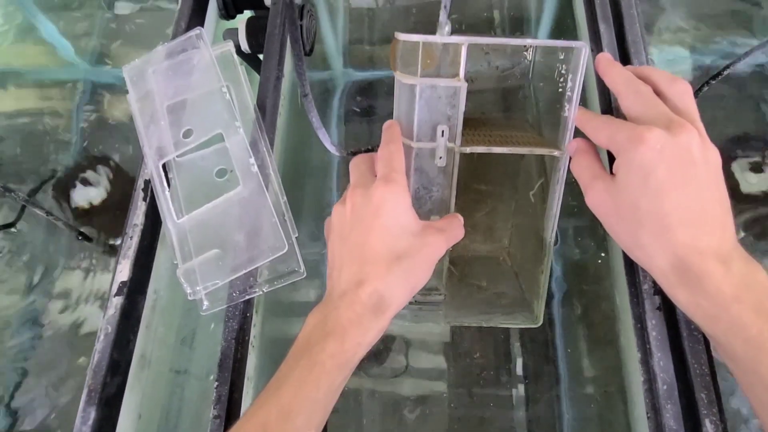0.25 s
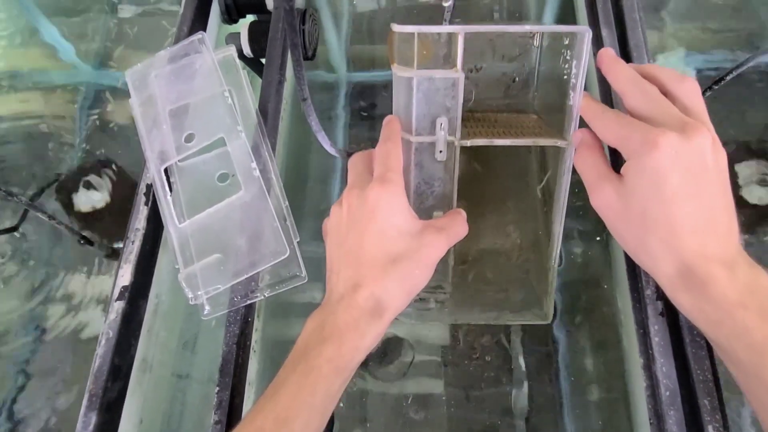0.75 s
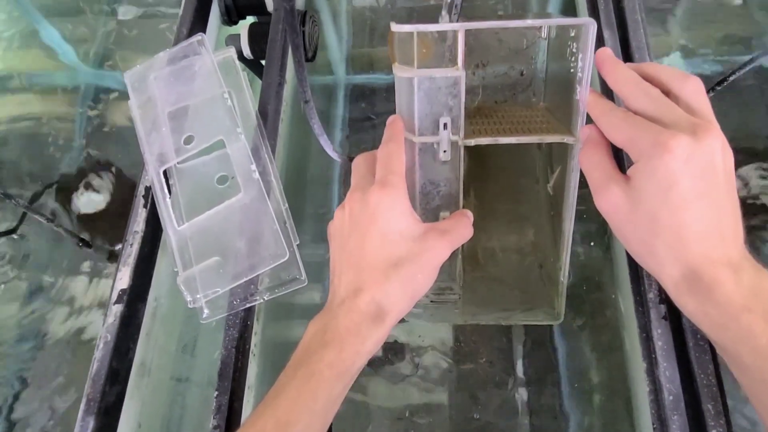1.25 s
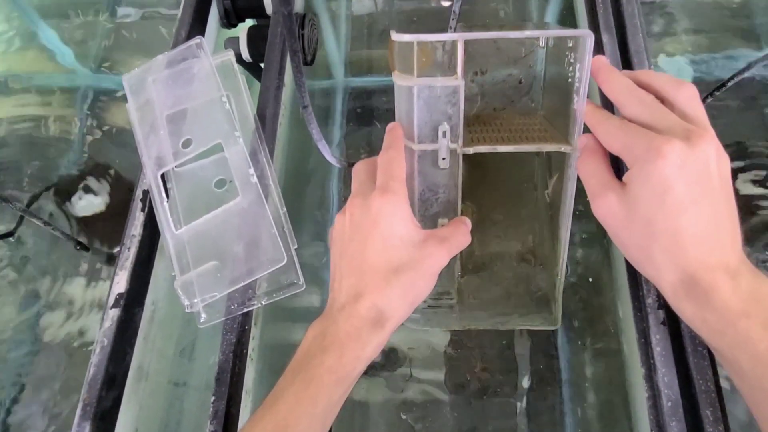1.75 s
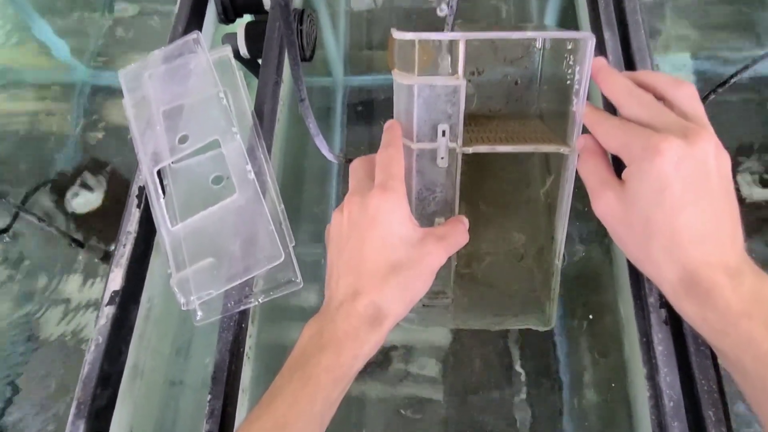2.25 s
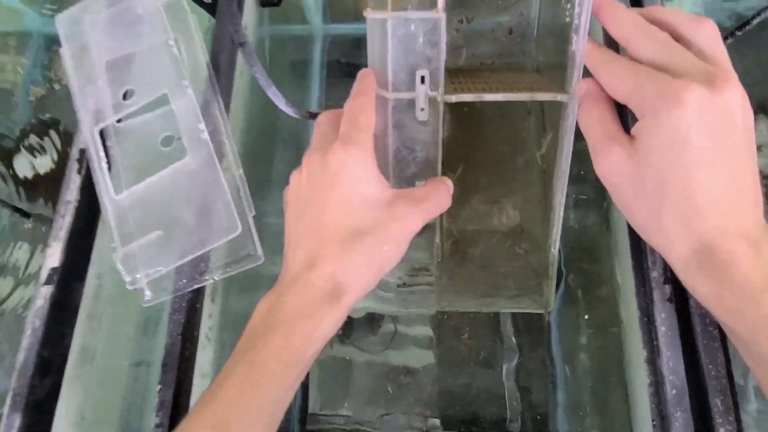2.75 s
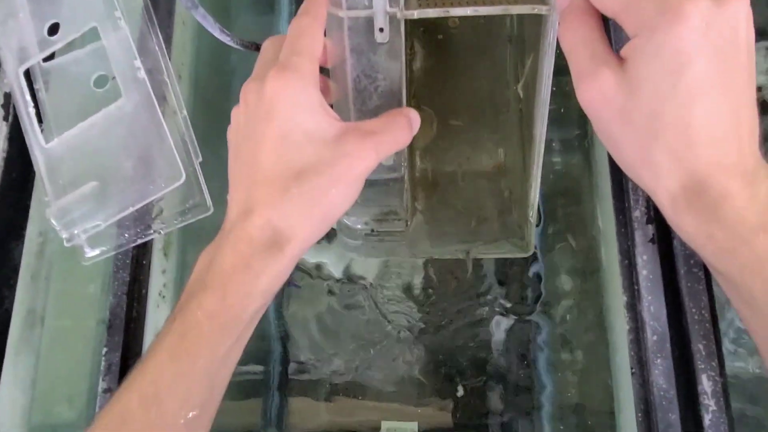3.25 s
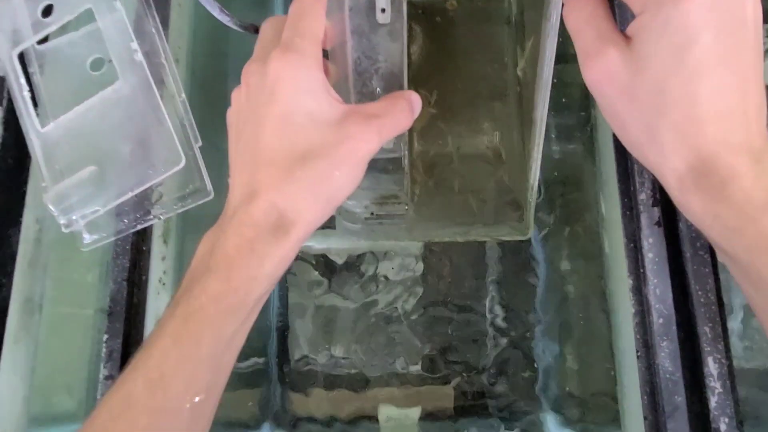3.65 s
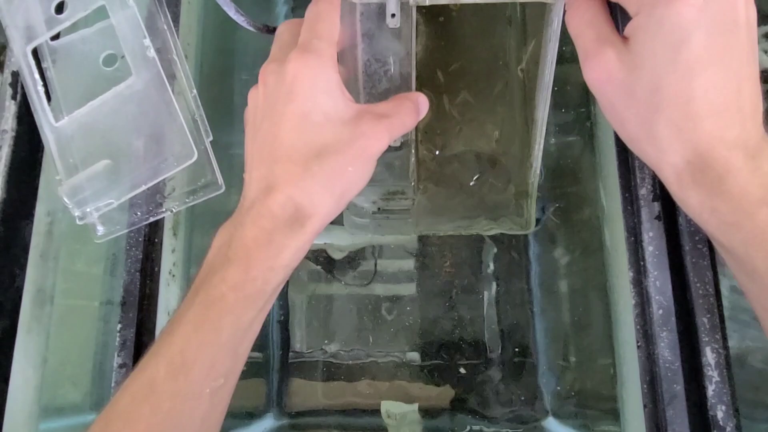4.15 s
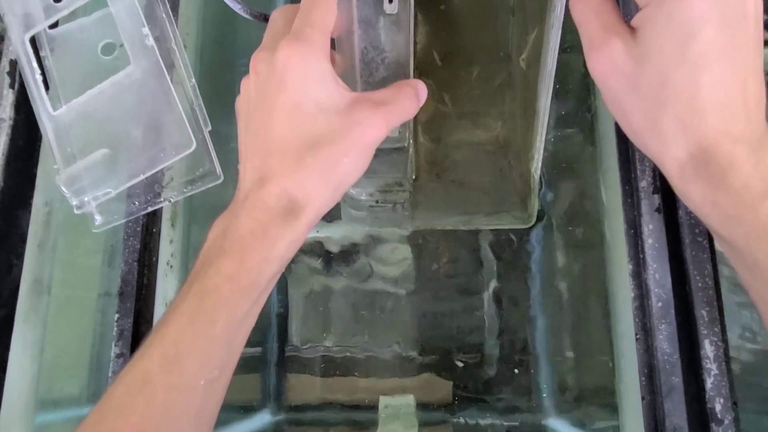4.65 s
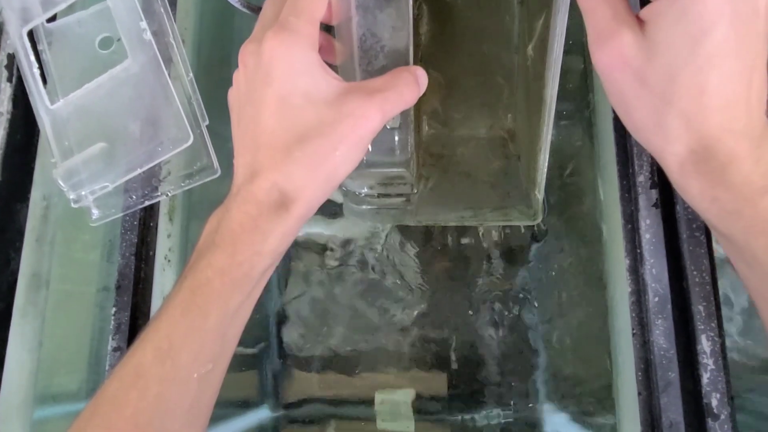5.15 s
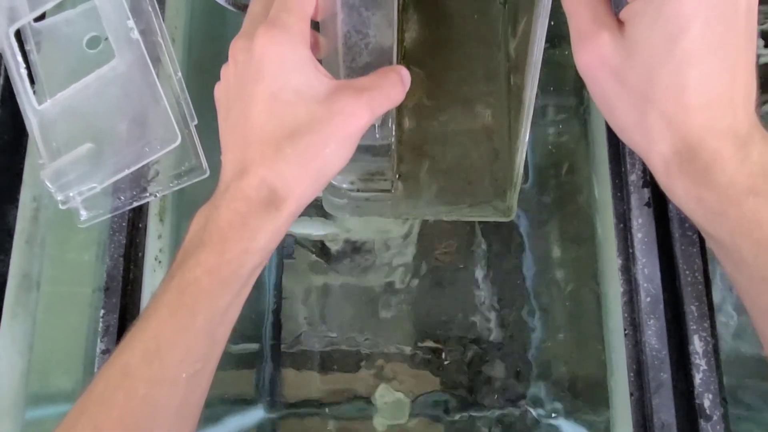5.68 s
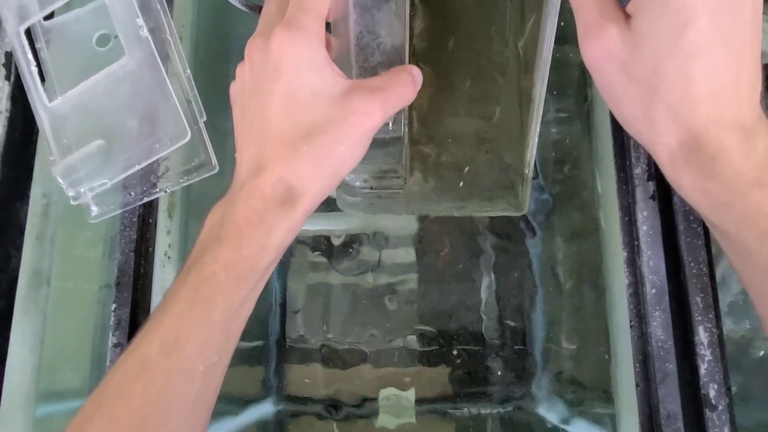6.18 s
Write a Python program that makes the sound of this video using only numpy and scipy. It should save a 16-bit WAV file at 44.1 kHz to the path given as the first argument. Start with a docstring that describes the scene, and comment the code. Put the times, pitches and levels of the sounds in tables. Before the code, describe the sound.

In a fish room, water dribbles unevenly into a plastic box: short pours, gulps, rising bubble plops, and small gaps in the first two and a half seconds, then longer gurgling pours with drops pattering on plastic. The boxy resonance sways in pitch. Quiet pumps rumble and air hisses softly. Close stereo microphones shift slightly along the box.

```python
"""In a fish room, water pours in a gurgling stream into a narrow plastic box held in a tank.
Uneven splashes excite the air pocket above the water, a resonator whose pitch sways as it sloshes.
The flow sputters into gulps, briefly stops and resumes; bubbles ring as decaying sines that climb in pitch.
Stray drops patter as noise bursts. Pumps hum as sines and rumble as noise; aeration hisses.
Box resonances, wall echoes and two microphones that shift along the box shape the stereo sound."""
import sys
import numpy as np
from scipy import signal
from scipy.fft import rfft, irfft, next_fast_len
from scipy.io import wavfile
from scipy.ndimage import uniform_filter1d, map_coordinates

SR = 44100
rng = np.random.default_rng(int(sys.argv[2]) if len(sys.argv) > 2 else 0)


def dump_mix(stems):
    """Bounce the given channels to the path in sys.argv[1] as a 16-bit WAV at rate SR."""
    frames = np.atleast_2d(stems).T  # one column per channel
    limited = np.clip(frames, -1, 1)  # hard clip at full scale
    pcm = np.round(limited * 32767).astype(np.int16)
    wavfile.write(sys.argv[1], SR, pcm)


N = 283122  # samples

# Levels of sources are relative: mixing gains, the box and the microphones act on them later.
# hum of the pumps: [f/Hz, level/dB]
PUMP_HUM = [(65, -46.5), (120, -52), (241, -53.5)]
# spectra of the pumps' rumble and of the aeration hiss: [f/Hz, level/dB]
RUMBLE_SPECTRUM = [(20, -24), (42, -11), (55, -9.5), (66, -2), (78, -7.5), (100, -4), (120, -10.5),
                   (140, -11), (195, -15), (240, -10.5), (330, -15), (480, -21.5), (800, -37.5)]
HISS_SPECTRUM = [(180, -17), (300, -2), (500, -4), (700, 2.5), (1250, -7), (1600, -5), (3000, -8.5),
                 (4100, -13), (4800, -16.5), (7200, -13.5), (9000, -18.5), (10700, -24), (12300, -17.5),
                 (15500, -29)]
# likeness of the diffuse noise in two channels: [f/Hz, correlation]
DIFFUSE_LIKENESS = [(60, 0.96), (180, 0.91), (550, 0.69), (1650, 0), (15000, 0)]
# reverberation of glass tanks and walls: [f/Hz, 60 dB decay time/s]
WALL_DECAY = [(200, 0.14), (1500, 0.12), (10000, 0.013)]
# lowest resonance of the swaying air pocket: [t/s, f/Hz]
POCKET_PITCH = [(0.0, 1038), (0.14, 1200), (0.29, 916), (0.48, 1110), (0.89, 997), (1.39, 1100),
                (1.59, 1000), (1.88, 1150), (1.97, 1025), (2.14, 976), (2.32, 1170), (2.68, 974),
                (2.93, 1130), (3.11, 1128), (3.27, 936), (3.61, 1150), (3.81, 922), (4.02, 1140),
                (4.27, 1002), (4.42, 1090), (5.08, 956), (5.26, 1160), (5.52, 980), (5.99, 1117),
                (6.24, 978), (6.42, 1103)]
# modes of the air pocket: [f at rest/Hz, width of first pass/Hz, level/dB, power of the sway followed]
POCKET_MODES = [(1062, 107, -1, 1), (2229, 270, 3.5, -0.066), (3393, 236, -1, -0.23),
                (4586, 310, -13, -0.3)]
# unbroken pours of the stream: [start t/s, end t/s, flow level/dB, spray level/dB]
POUR_SPELLS = [(-0.03, 0.07, -26, -32), (0.125, 0.309, -27.5, -29), (0.353, 0.412, -24, -43),
               (0.696, 0.97, -22, -28), (0.96, 1.062, -24, -30), (1.35, 1.46, -27, -50),
               (1.484, 1.652, -22, -31.5), (1.926, 1.965, -31, -30.5), (1.989, 2.227, -23, -30),
               (2.448, 2.559, -30, -34), (2.526, 2.982, -25, -31), (3.025, 3.033, -29, -36),
               (3.085, 3.106, -24, -31), (3.143, 3.456, -23, -34), (3.659, 3.89, -23.5, -33.5),
               (3.878, 3.985, -20, -32), (4.075, 4.265, -22, -31.5), (4.31, 4.367, -24, -39),
               (4.415, 4.894, -23, -32), (4.936, 5.17, -26, -44.5), (5.158, 5.244, -20, -35),
               (5.328, 5.522, -24, -32), (5.574, 6.185, -24, -31), (6.219, 6.275, -24.5, -34.5),
               (6.308, 6.425, -21, -32.5)]
# heaviest drops on the plastic: [t/s, level/dB]
HEAVY_DROPS = [(0.092, -34.5), (0.275, -39), (0.746, -35), (0.875, -36.5), (0.934, -32.5), (1.534, -36),
               (1.649, -41), (2.583, -29.5), (2.776, -31), (3.217, -33), (3.784, -35.5), (4.143, -30),
               (4.319, -32.5), (5.688, -37)]
# loud single bubbles: [t/s, level/dB, nominal f/Hz]
LOUD_BUBBLES = [(0.396, -7.5, 2013), (0.419, -16, 1710), (0.464, -28, 1340), (0.706, -18, 2000),
                (0.941, -3, 3360), (1.099, -17, 1320), (1.125, -13.5, 2880), (1.144, -17, 2230),
                (1.259, -14.5, 4620), (1.285, -5.5, 1203), (1.386, -7, 2560), (1.689, -3, 1860),
                (1.719, -10, 1366), (1.772, -6.5, 1850), (1.863, -6, 1240), (1.913, -7.5, 1256),
                (1.946, -9, 1886), (2.288, -22, 1310), (3.042, -7.5, 1045), (3.118, -11, 1250),
                (3.434, -8.5, 2080), (3.454, -9, 1123), (3.478, -10, 2840), (3.600, -9.5, 4300),
                (3.986, -6, 1810), (4.091, -6, 3376), (5.292, -7.5, 2124), (5.301, -7, 2970),
                (5.313, -2, 1144), (5.348, -5, 3450), (5.693, -3.5, 3550)]
# spells in which the choked stream gurgles: [start t/s, end t/s, level of the loudest bubbles/dB]
GURGLE_SPELLS = [(0.399, 0.499, -24), (1.081, 1.20, -16.5), (1.376, 1.507, -11), (1.665, 1.757, -16),
                 (1.88, 1.979, -18), (2.244, 2.295, -24), (3.418, 3.501, -13), (3.959, 4.086, -11),
                 (5.222, 5.329, -16)]
# slugs of water where the stream breaks up: [t/s, level/dB, spray level relative to the slug/dB]
WATER_SLUGS = [(0.125, -12, -8), (0.383, -11, -14), (0.674, -7.5, -30), (0.79, -7.5, -21),
               (1.120, -15, -20), (1.165, -11, -37), (1.219, -14.5, -16), (1.314, -16.5, -10),
               (1.367, -11, -24), (1.408, -13.5, -37), (1.465, -9.5, -26), (1.675, -10.5, -32),
               (1.743, -12.5, -38), (1.772, -8, -31), (1.889, -8.5, -14), (1.997, -16, 4),
               (2.274, -23, -30), (2.328, -26, -4), (2.421, -16, 2), (3.027, -10, -14), (3.477, -8.5, -33),
               (3.521, -10, -15), (3.573, -15, -23), (3.621, -13, -23), (3.671, -10.5, 0), (4.054, -6, -34),
               (4.418, -4, -6), (5.254, -22, -36), (5.587, -18.5, -35)]
# bubble sizes that a slug traps: [central f/Hz, level/dB]
TRAPPED_BUBBLES = [(1230, -15), (1930, -12.5), (2900, -13)]
# spectra of a slug's splash, of the stream's wash and of fine spray: [f/Hz, level/dB]
SLUG_SPECTRUM = [(200, -11.5), (500, -7.5), (750, -6.5), (1150, 8.5), (1450, -24), (1900, 5.5), (2500, 0.5),
                 (3100, 8), (3700, -14), (4800, -7.5), (5400, -19), (15000, -39)]
WASH_SPECTRUM = [(150, -19.5), (450, -10), (600, 2.5), (1200, 2), (1450, -13), (1800, -1), (2450, 2),
                 (2700, -1), (3150, 4.5), (3900, -23), (4800, -14), (5300, -56), (15000, -78)]
SPRAY_SPECTRUM = [(2500, -58), (4000, 17.5), (5300, 2.5), (8700, 11), (10500, -7), (12200, 5.5),
                  (15500, -9)]
# fixed resonances of the box: [f/Hz, width/Hz, level/dB, left minus right level/dB]
BOX_MODES = [(690, 170, -5, 2), (975, 65, 0, -3), (1125, 60, 0, 3), (1285, 90, 0, -8), (1960, 130, -1, -7),
             (2220, 210, -6, 1), (2460, 110, -7, 0), (3350, 120, -4, -4)]
# balance of the microphones, before each position's offset: [f/Hz, left minus right level/dB]
MIC_BALANCE = [(400, -2), (800, -5.5), (1100, 0.5), (2200, -2), (4200, -8), (6500, -0.5)]
# lead of the nearer, left microphone at the second position: [f/Hz, phase/rad]
MIC_LEAD = [(20, 0), (650, .5), (950, 0), (1180, 1.9), (1600, .9), (1950, 2.2), (2250, 1.9), (3300, 4.3),
            (4650, 6.6), (8900, 11.4), (15000, 18.5)]
# colour of the water at the first position: [f/Hz, level/dB]
FIRST_POSITION_COLOUR = [(700, 0.5), (1000, 1.5), (1130, -6.5), (1300, 1), (1600, 4), (1950, 0.5),
                         (2250, -1), (2800, 1.5), (3400, 0), (5000, 1.5)]

PUMP_DB, PUMP_RISE_DB = -43, 1  # relative rumble level; its gain once the microphones have moved
MOVE_S, MOVE_LENGTH_S = 2.25, 0.87  # start and length of the microphones' shift along the box
FIRST_LEAD_SHARE, FIRST_PAN_DB = 0.76, -2  # first position: shorter lead, and more on the right
ATTACK_S, RELEASE_S = 0.017, 0.06  # a pour swells linearly, then drains (e-fold time)
SPRAY_ATTACK_S, SPRAY_RELEASE_S = 0.0067, 0.019  # its spray stops sooner
SAG_DB_PER_S, SPRAY_SAG_DB_PER_S = 1.5, 2.5  # a pour weakens as it runs
CREST_DB_PER_OCTAVE = 6  # cresting water drives the air pocket harder
WAVER = 0.012  # share by which ripples detune each pocket mode, per unit of random curve
DROP_DB, DROP_RANGE_DB = -10, 18  # lighter drops: relative level of the largest; range of sizes
DROP_SPRAY_DB, DROP_SPRAY_S = 4.5, 0.027  # spray surge of a heavy drop: table offset, e-fold time
BUBBLE_ATTACK_S, BUBBLE_T60_S = 0.00035, 0.036  # e-fold rise; 60 dB decay at 1500 Hz
BUBBLE_RISE = 0.15  # pitch climb as a share of the nominal pitch
GLASS_ECHO_S, GLASS_ECHO_DB = 0.006, -6  # mean delay and gain of the tank wall's reflection
TICK_DB, TICK_RANGE_DB, TICK_T60_S = -29.5, 18, 0.008  # loudest tick, range of levels, decay
GURGLE_HZ, GURGLE_OCTAVES, GURGLE_RANGE_DB = 1205, 1.6, 19  # lowest bubble; ranges of pitch and level
GULP_ATTACK_S, GULP_S = 0.0013, 0.014  # e-fold rise and Gaussian length of a slug's splash
GULP_BUBBLES_S, BUBBLE_SCATTER_OCTAVES = 0.024, 0.14  # time over which bubbles form; pitch scatter each way
TOP_HZ = 15750  # band limit
SIDES = np.array([[.5], [-.5]])  # left and right halves of a difference


def amp(db):
    """Logarithmic level: decibels become an amplitude gain."""
    return 10 ** (np.asarray(db) / 20)


def unit(x):
    """Normalisation of power: the signal is scaled to rms 1."""
    return x / np.sqrt(np.mean(x ** 2) + 1e-20)


def along(points, hz):
    """Logarithmic frequency: (f/Hz, value) points are interpolated on a log axis."""
    f, value = np.transpose(points)
    return np.interp(np.log(hz + 1), np.log(f + 1), value)


def wobble(rate):
    """Band-limited fluctuation: a smooth random curve with rate knots per second."""
    knots = rng.standard_normal(int(N * rate / SR) + 4)
    return map_coordinates(knots, [np.arange(N) * rate / SR])


def filtered(x, response):
    """Linear filtering: the spectrum is multiplied by a complex response of frequency."""
    n = x.shape[-1]
    m = next_fast_len(n + SR // 8)
    return irfft(rfft(x, m) * response(np.fft.rfftfreq(m, 1 / SR)), m)[..., :n]


def coloured(x, spectrum, size=2048):
    """Minimum phase: a folded cepstrum gives a causal filter with the (f/Hz, level/dB) spectrum."""
    cepstrum = irfft(np.log(amp(along(spectrum, np.fft.rfftfreq(size, 1 / SR)))))
    cepstrum[1:size // 2] *= 2
    cepstrum[size // 2 + 1:] = 0
    impulse = irfft(np.exp(rfft(cepstrum)))
    return signal.fftconvolve(x, impulse)[:len(x)]


def add(track, s, sound):
    """Superposition: a sound is summed into a track at time s."""
    part = track[max(round(s * SR), 0):][:len(sound)]
    part += sound[:len(part)]


def moved():
    """Linear displacement: how far the microphones have shifted, 0 to 1."""
    return np.clip((np.arange(N) / SR - MOVE_S) / MOVE_LENGTH_S, 0, 1)


def ambience(spectrum):
    """Spatial coherence: in-phase and opposed noise mix so that two channels are alike in the bass."""
    def spread(hz):
        turn = np.arccos(np.clip(along(DIFFUSE_LIKENESS, hz), -1, 1)) / 2
        return amp(along(spectrum, hz)) * np.array([np.cos(turn), np.sin(turn)])

    mid, side = filtered(rng.standard_normal((2, N)), spread)
    return unit(np.array([mid + side, mid - side]))


def fish_room():
    """Tonal and broadband noise: pumps hum and rumble, the aeration of other tanks hisses."""
    t = np.arange(N) / SR
    hum = np.zeros(N)
    for hz, db in PUMP_HUM:
        level = amp(db + 2.06 * wobble(3.3)) * np.sqrt(2)
        hum += level * np.sin(2 * np.pi * hz * t + 1.5 * wobble(5.5))
    pumps = hum + amp(PUMP_DB + PUMP_RISE_DB * moved()) * ambience(RUMBLE_SPECTRUM)
    hiss = amp(-38.5 + 1.4 * wobble(30) + 1.1 * wobble(300)) * ambience(HISS_SPECTRUM)
    # the pumps are slightly louder on the right
    return pumps * amp([[-.7], [.7]]) + hiss


def walls(x, count=12):
    """Reverberation: glass and walls return decaying noise, redrawn at intervals; the treble dies first."""
    out = np.zeros((2, N))
    place = np.linspace(0, count - 1, N)
    for k in range(count):
        hz, t, z = signal.stft(rng.standard_normal((2, SR // 4)), SR, nperseg=256)
        decay = amp(-60 * t / along(WALL_DECAY, hz)[:, None])
        tail = signal.istft(z * decay, SR, nperseg=256)[1]
        # successive draws crossfade
        near = np.flatnonzero(np.abs(place - k) < 1)
        piece = x[near] * np.cos(np.pi / 2 * (place[near] - k))
        for track, echo in zip(out, tail):
            add(track, near[0] / SR + 0.002021, signal.fftconvolve(piece, echo / np.linalg.norm(echo)))
    return out


def sway():
    """Cavity resonance: the pocket's pitch relative to rest rises as the sloshing water crests."""
    s, hz = np.transpose(POCKET_PITCH)
    return np.interp(np.arange(N) / SR, s, hz) / POCKET_MODES[0][0]


def spray_surges():
    """Impact atomisation: each heavy drop throws up spray whose gain decays exponentially."""
    out, t = np.zeros(N), np.arange(SR // 8) / SR
    for s, db in HEAVY_DROPS:
        add(out, s, amp(db + DROP_SPRAY_DB) * np.exp(-t / DROP_SPRAY_S))
    return out


def pouring():
    """Unsteady flow: levels of flow and spray in dB as each pour swells, sags slowly and drains."""
    def shape(age, over, attack, release, sag_db):
        return np.minimum(age / attack, 1) * np.exp(-over / release) * amp(-sag_db * age)

    t = np.arange(N) / SR
    flow, spray = np.full((2, N), amp(-64))
    for start, end, flow_db, spray_db in POUR_SPELLS:
        age, over = np.maximum(t - start, 0), np.maximum(t - end, 0)
        pour = amp(flow_db) * shape(age, over, ATTACK_S, RELEASE_S, SAG_DB_PER_S)
        mist = amp(spray_db) * shape(age, over, SPRAY_ATTACK_S, SPRAY_RELEASE_S, SPRAY_SAG_DB_PER_S)
        flow, spray = np.maximum(flow, pour), np.maximum(spray, mist)
    flow_db = 20 * np.log10(flow) + CREST_DB_PER_OCTAVE * np.log2(sway())
    return flow_db, 20 * np.log10(np.hypot(spray, spray_surges()))


def spatter(count=70):
    """Impact noise: stray drops patter on the plastic, the light ones harder when the stream sprays."""
    out, t = np.zeros(N), np.arange(SR // 12) / SR
    when, size = rng.random((count, 2)).T
    light_db = pouring()[1][(when * N).astype(int)] + DROP_DB - DROP_RANGE_DB * size
    light = np.transpose([when * N / SR, light_db])
    for s, db in np.vstack([HEAVY_DROPS, light]):
        envelope = amp(db + 2.5 - 60 * t / 0.063) * (1 - np.exp(-t / 0.0015))
        add(out, s, envelope * rng.standard_normal(len(t)))
    return coloured(out, SPRAY_SPECTRUM)


def ticks(count=90):
    """Damped oscillation: tiny bubbles burst at the surface, each a faint high ping."""
    out, t = np.zeros(N), np.arange(SR // 50) / SR
    for when, pitch, size in rng.random((count, 3)):
        decay = amp(TICK_DB - TICK_RANGE_DB * size - 60 * t / TICK_T60_S)
        add(out, when * N / SR, decay * np.sin(2 * np.pi * 4200 * 3 ** pitch * t))
    return out


def bubble(hz):
    """Volume pulsation: a bubble of peak 1 rings down, climbs in pitch and is reflected by the glass."""
    t = np.arange(SR // 16) / SR
    age = t / (BUBBLE_T60_S * np.sqrt(1500 / hz))  # high bubbles die sooner
    phase = 2 * np.pi * np.cumsum(hz * (.96 + BUBBLE_RISE * np.minimum(age, 1))) / SR
    ring = amp(-60 * age) * (1 - np.exp(-t / BUBBLE_ATTACK_S)) * np.sin(phase)
    add(ring, GLASS_ECHO_S * rng.uniform(.8, 1.2), amp(GLASS_ECHO_DB) * ring)
    return ring / np.abs(ring).max()


def bubbles(count=900):
    """Air entrainment: loud bubbles plop singly, fainter ones crowd in, stronger with flow and crests."""
    out = np.zeros(N)
    flow_db, froth_db = pouring()
    trapped_db = 0.48 * flow_db + .3 * froth_db + 25 * (sway() - 1) - 6
    when, pitch, size = rng.random((count, 3)).T
    faint_db = trapped_db[(when * N).astype(int)] + 13 * size ** 2 - 6 * pitch
    faint = np.transpose([when * N / SR, faint_db, 1150 * 3.8 ** pitch])
    for s, db, hz in np.vstack([LOUD_BUBBLES, faint]):
        add(out, s, amp(db - 10.0) * bubble(hz))
    return out


def gurgles(count=14):
    """Polydisperse bubbling: while the stream chokes, bubbles of mixed sizes tumble out."""
    out = np.zeros(N)
    for start, end, db in GURGLE_SPELLS:
        for when, pitch, size in rng.random((count, 3)):
            hz = GURGLE_HZ * 2 ** (GURGLE_OCTAVES * pitch)
            level = amp(db - 10 - GURGLE_RANGE_DB * size)
            add(out, start + when * (end - start), level * bubble(hz))
    return out


def gulps(count=3):
    """Impact and entrainment: a slug lands with a short splash and bubbles, brighter when it sprays."""
    out, t = np.zeros(N), np.arange(SR // 10) / SR
    for s, db, spray_db in WATER_SLUGS:
        envelope = np.exp(-(t / GULP_S) ** 2) * (1 - np.exp(-t / GULP_ATTACK_S))
        burst = rng.standard_normal(len(t)) * envelope
        tilt = [(1500, 0), (3300, 0.65 * (spray_db + 8.5))]
        splash = coloured(coloured(burst, SLUG_SPECTRUM), tilt)
        add(out, s, amp(db - 5) * splash / np.abs(splash).max())
        for hz, size_db in TRAPPED_BUBBLES:
            for late, pitch, size in rng.random((count, 3)):
                ring = bubble(hz * 2 ** (BUBBLE_SCATTER_OCTAVES * (2 * pitch - 1)))
                level = amp(db + size_db + along(tilt, hz) - 19 * size)
                add(out, s + GULP_BUBBLES_S * late ** 2, level * ring)
    return out


def patter(rate, scatter, spread_db, life):
    """Shot noise: unequal impacts at uneven intervals, each an envelope that decays in life seconds."""
    draws = rng.standard_normal((4000, 2))
    gaps = np.exp(scatter * draws[:, 0] - scatter ** 2 / 2)
    at = (np.cumsum(gaps) * SR / rate).astype(int)
    sizes = amp(spread_db * np.minimum(draws[:, 1], 2))
    kicks = np.bincount(at[at < N], sizes[at < N], N)
    return unit(signal.lfilter([1], [1, -np.exp(-1 / (life * SR))], kicks))


def resonate(x, hz, width_hz):
    """Heterodyning: a one-pole low-pass, shifted up in frequency, is a resonance whose centre moves."""
    turn = np.exp(2j * np.pi * np.cumsum(hz) / SR)
    return (turn * signal.lfilter([1], [1, -np.exp(-np.pi * width_hz / SR)], x / turn)).real


def stream():
    """Forced resonance: splashes drive the swaying pocket; froth feeds its upper modes and a fine fizz."""
    flow_db, froth_db = pouring()
    surge_db = 0.6 * wobble(20)
    flow_db, froth_db = flow_db + surge_db, froth_db + surge_db + 4.0 * wobble(12)
    pitch = sway()
    impacts = patter(rate=135, scatter=.45, spread_db=3.5, life=0.0016)

    def churn(steady):
        return (impacts + steady) * rng.standard_normal(N)

    between_db = 0.36 * flow_db + 0.78 * froth_db
    spray_db = froth_db + 2 * wobble(35)
    # the lowest mode sings almost steadily, the upper ones follow single impacts: (level, steady share)
    drives = [(flow_db + 1.3 * wobble(35), .7), (between_db, .3), (spray_db, .2), (spray_db, .1)]
    rings = np.zeros(N)
    for (hz, width_hz, db, follows), (drive_db, steady) in zip(POCKET_MODES, drives):
        centre = hz * pitch ** follows * (1 + WAVER * wobble(35))
        # a second, wider pass keeps the valleys between the modes dark
        narrow = resonate(churn(steady), centre, width_hz)
        ring = unit(resonate(narrow, centre, 2.0 * width_hz))
        # strong swings lose more to the moving water
        power = np.abs(uniform_filter1d(ring ** 2, size=SR // 500))
        ring /= np.sqrt(1 + 2 * steady * power)
        rings += amp(drive_db + db - 4.0) * unit(ring)
    wash = amp(.5 * flow_db + .5 * froth_db - 6.5) * unit(coloured(churn(0.49), WASH_SPECTRUM))
    fizz = amp(spray_db - 25.0 + 4.6 * wobble(8.8)) * unit(coloured(churn(0.074), SPRAY_SPECTRUM))
    return rings + wash + fizz


def box(x, direct):
    """Modal radiation: sound leaves partly straight, partly through fixed modes with their own balance."""
    def response(f):
        modes = 0
        for centre, width, db, pan_db in BOX_MODES:
            damping = 1j * f * width
            modes = modes + amp(db + SIDES * pan_db) * damping / (centre * centre - f * f + damping)
        return direct + modes

    return filtered(x, response)


def microphones(x, pan_db, lead):
    """Level and phase differences: the water reaches two microphones unequally strong and early."""
    def response(hz):
        balance = amp(SIDES * (along(MIC_BALANCE, hz) + pan_db))
        return balance * np.exp(1j * SIDES * lead * along(MIC_LEAD, hz))

    return filtered(x, response)


def scene():
    """Superposition: boxed water at the two shifting microphones, its echo and the room are summed."""
    water = box(stream() + gulps() + gurgles() + bubbles() + spatter() + ticks(), direct=0.59)
    first = np.array([coloured(side, FIRST_POSITION_COLOUR) for side in water]) * (1 - moved())
    second = water * moved()
    near = microphones(first, FIRST_PAN_DB, FIRST_LEAD_SHARE) + microphones(second, pan_db=0.3, lead=1)
    echo = amp(-9) * walls((first + second).mean(axis=0))
    return near + echo + fish_room()


def record(dry):
    """Band limitation: nothing is kept at or above the limit."""
    return filtered(dry, lambda hz: hz < TOP_HZ)


dry = scene()
out = record(dry)
dump_mix(out)
```